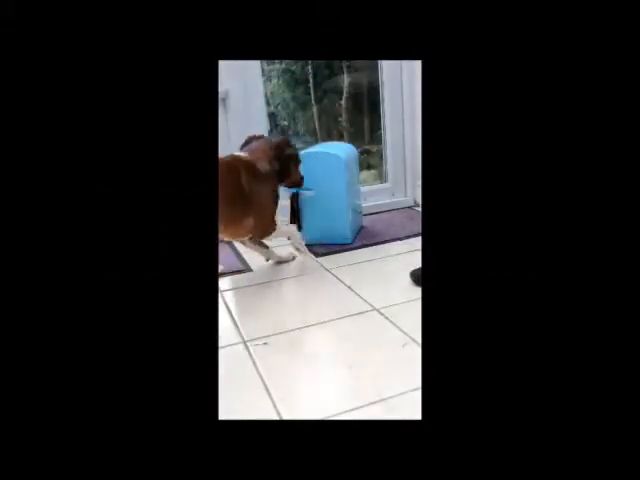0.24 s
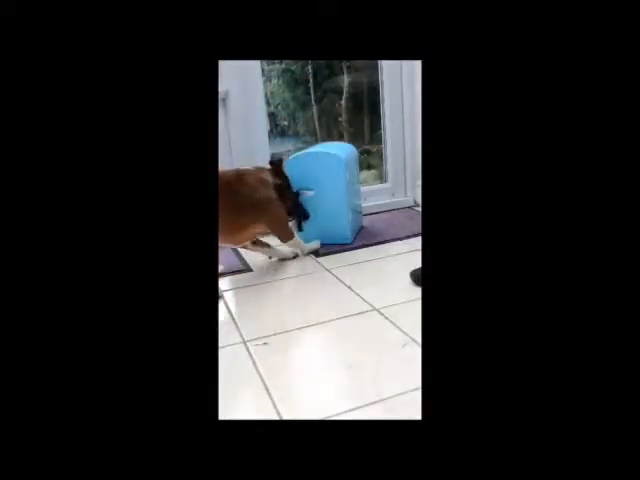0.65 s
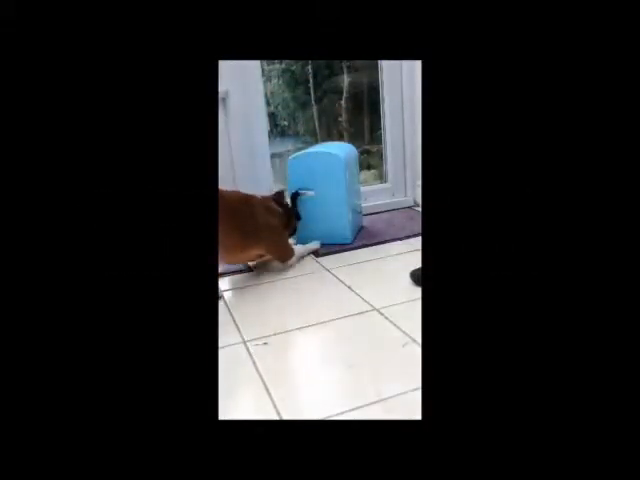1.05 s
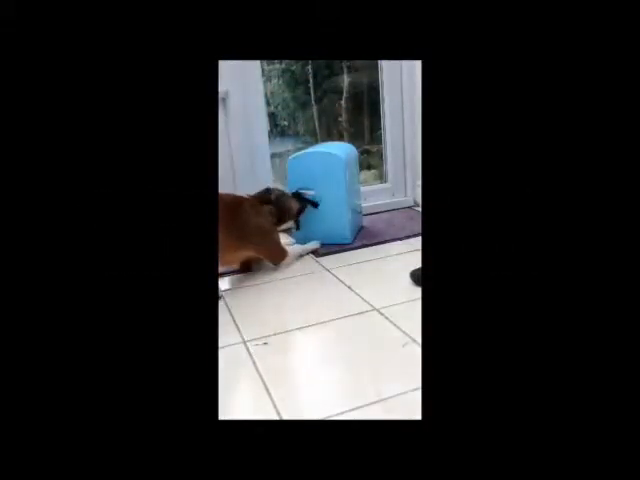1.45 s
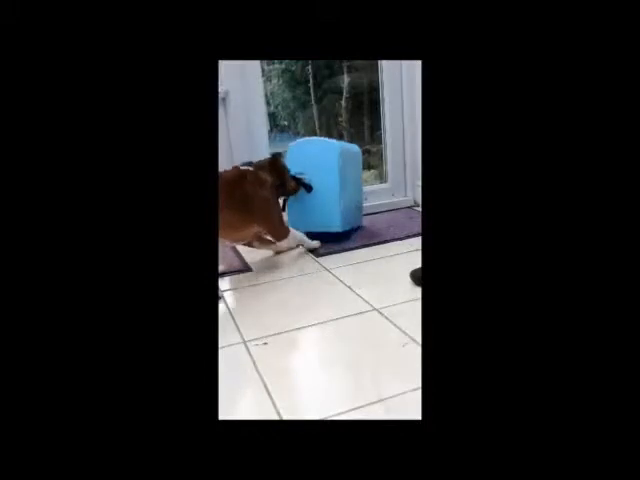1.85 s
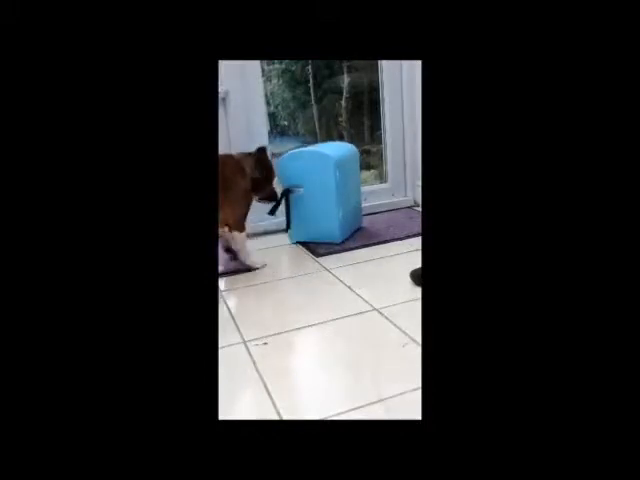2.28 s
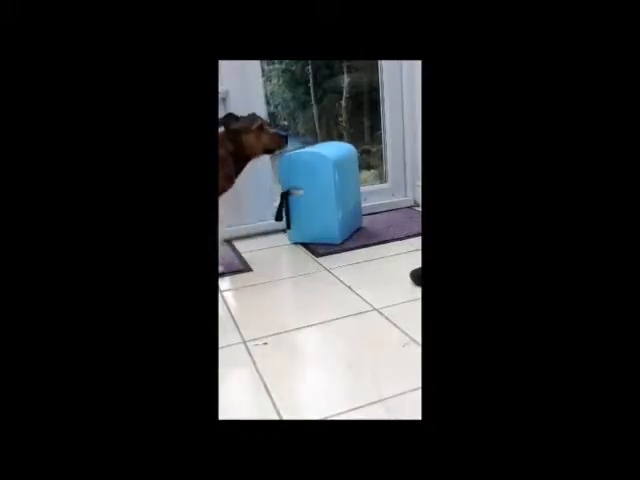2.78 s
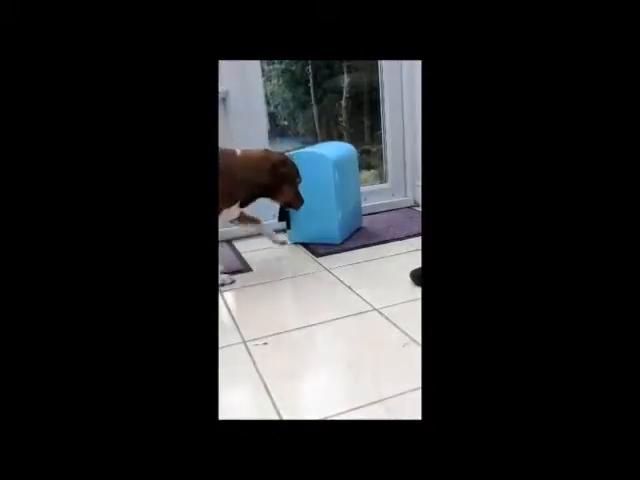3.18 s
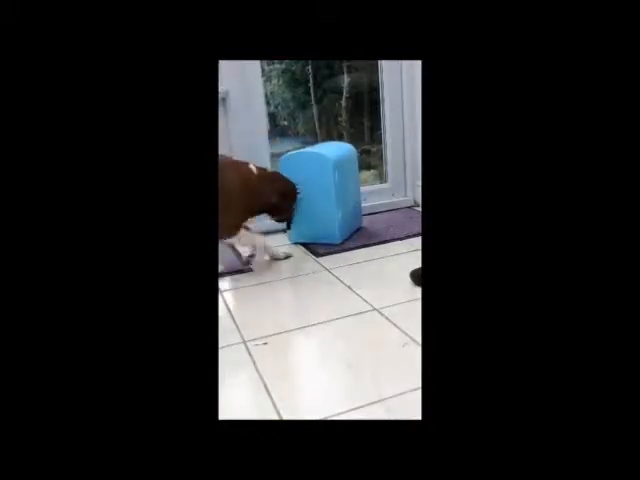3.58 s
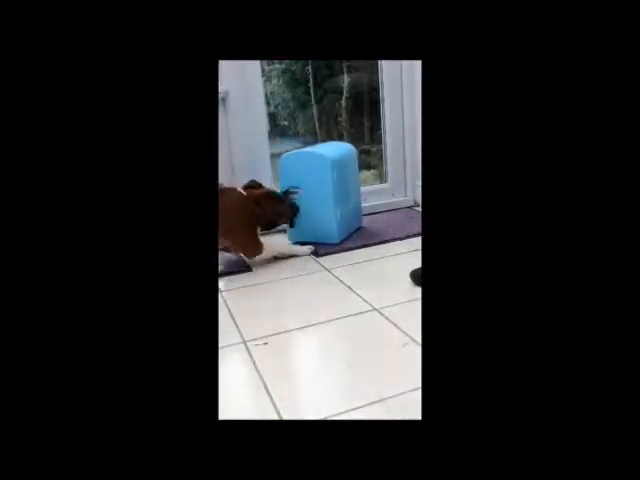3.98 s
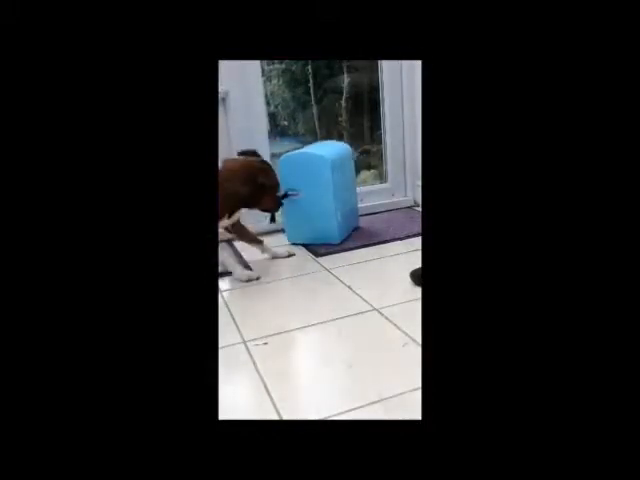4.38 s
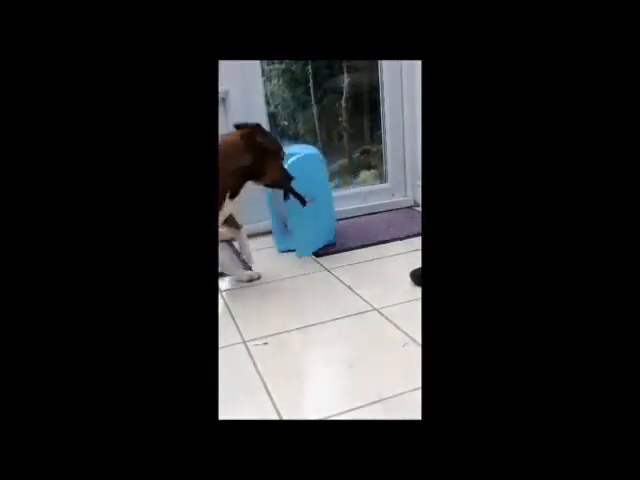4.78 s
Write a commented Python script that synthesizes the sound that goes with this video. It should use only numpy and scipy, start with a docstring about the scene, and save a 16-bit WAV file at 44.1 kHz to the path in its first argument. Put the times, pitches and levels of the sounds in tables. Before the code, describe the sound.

Sharp claw clicks open the scene, joined by plastic knocks within the first second or so. Small bumps, creaky rubs and faint nostril puffs follow, with a brief paw skid in the middle. Late on, sliding grows and the hollow box bangs and clacks as it is dragged. Small hard-surfaced kitchen, near handheld microphone, soft room hiss and motor hum.

```python
"""In a bright tiled kitchen a dog walks to a small plastic fridge, noses and tugs its door strap and drags it about.
Claws and box are struck resonators: clicks set decaying sines ringing, as short ticks and hollow knocks.
Rubbing on the mat is a dense train of slips through the box modes; skids and snuffles are shaped noise.
Band-by-band decaying noise answers as the room, over steady hiss and a faint motor hum."""
import sys
import numpy as np
from scipy import signal
from scipy.io import wavfile

SR = 44100
rng = np.random.default_rng(int(sys.argv[2]) if len(sys.argv) > 2 else 0)


def to_wav(sig):
    """Store sig (one row per channel, or 1-D mono) as 16-bit WAV at the path in sys.argv[1].

    Samples outside -1..1 are clipped; the rate is SR.
    """
    pcm = np.clip(np.atleast_2d(sig), -1, 1) * 32767
    pcm = np.round(pcm).astype(np.int16)
    wavfile.write(sys.argv[1], SR, pcm.T)  # frames by channels


def how_loud(loudness_db):
    """Turn decibels into a plain amplitude multiplier (0 dB gives 1, 20 dB gives 10)."""
    steps = np.asarray(loudness_db, float) / 20
    return 10 ** steps


N = 221900


def rms_one(x):
    """Normalisation: scale to a root-mean-square value of 1."""
    return x / np.sqrt(np.mean(x ** 2) + 1e-20)


def at_hz(points, hz, column=1):
    """Logarithmic frequency scale: interpolate a table column along it."""
    points = np.array(points)
    return np.interp(np.log(hz), np.log(points[:, 0]), points[:, column])


def filtered(x, order, cut_hz, kind):
    """Linear filtering: a Butterworth response of the given order and kind."""
    return signal.sosfilt(signal.butter(order, cut_hz, kind, fs=SR, output="sos"), x)


def strokes(rows, attack_s, release_s):
    """Amplitude envelope: for each row a straight rise, a hold and a straight fall."""
    t = np.arange(N) / SR
    envelopes = []
    for s, held_s, db, *_ in rows:
        corners = [s - attack_s, s, s + held_s, s + held_s + release_s]
        envelopes.append(np.interp(t, corners, [0, how_loud(db), how_loud(db), 0]))
    return np.array(envelopes)


def blend(levels, values):
    """Weighted mean: a quality follows the strokes then sounding, by their strength."""
    return np.sum(levels * values, axis=0) / (levels.sum(axis=0) + 1e-12)


def drift(rate_hz):
    """Low-pass random fluctuation: two equal poles at rate_hz leave slow chance with spread 1."""
    r = np.exp(-80 * np.pi * rate_hz / SR)   # computed at one point per 40 samples
    white = rng.standard_normal(N // 40 + 2002)
    slow = signal.lfilter([1], [1, -2 * r, r * r], white)[2000:]
    return np.interp(np.arange(N) / 40, np.arange(len(slow)), rms_one(slow))


def ring(clicks, hz, t60):
    """Damped resonance: a unit click starts a sine of height 1, with t60 never below 1 ms."""
    r = how_loud(-60 / (max(t60, .001) * SR))
    w = 2 * np.pi * hz / SR
    return signal.lfilter([0, np.sin(w)], [1, -2 * r * np.cos(w), r * r], clicks + 1e-18)


def strike(times, modes, gains_db, scatter_db, pan_db=0, contact_s=0):
    """Modal excitation: each blow starts each mode at its own strength and moment; gains_db is blows x modes."""
    flight_s = 0.000996
    sides_db = pan_db * np.array([[.5], [-.5]])   # left, right
    chance = rng.standard_normal((len(times), len(modes), 2))
    out = 0
    for k, (hz, level_db, t60) in enumerate(modes):
        delay_s = flight_s + contact_s * abs(chance[:, k, 1])
        at = ((np.array(times) + delay_s) * SR).astype(int)
        strength_db = gains_db[:, k] + level_db + scatter_db * chance[:, k, 0]
        clicks = np.zeros((2, N))
        clicks[:, at] = how_loud(strength_db + sides_db) * (-1) ** k   # alternate modes start inverted
        out = out + ring(clicks, hz, t60)
    return out


def bands(size, likeness):
    """Interaural coherence: half-octave stereo noise whose mid and side shares set left-right likeness."""
    edges_hz = 22 * 2 ** np.arange(0, 9.6, .5)
    white = rng.standard_normal((2, 2, size))   # neighbouring bands use different noise
    for k, (low, high) in enumerate(zip(edges_hz, edges_hz[1:])):
        mid, side = filtered(white[k % 2], 2, [low, high], "band")
        hz = np.sqrt(low * high)
        alike = np.clip(at_hz(likeness, hz), 0, 1)
        yield hz, np.sqrt(1 + alike) * mid + np.sqrt(1 - alike) * side * [[1], [-1]]


# claws on tile: t/s, strength/dB, tick centre f/Hz, tile clack re strength/dB,
# direct path as shaded by the dog's body/dB
CLAWS = [(0.0537, -7, 11000, -28, -5), (0.2188, -11, 9000, -18.5, -12.5), (0.6884, -0.5, 10200, -7, 0.5),
         (1.0268, 0.5, 6500, -17.5, -4), (2.1996, -7, 9700, -37, 1), (3.024, -14.5, 10100, -20, -5),
         (3.3553, -29.5, 8960, -35, -1), (3.6382, -30.5, 7250, -9, -7), (3.706, -30, 8540, -31, 2.5),
         (3.8352, -40, 9780, -13, -1), (4.586, -20, 7980, -16, -4)]
# modes of the hard claw tip: f/Hz, level/dB, t60/s
CLAW_MODES = [(4500, 1.5, 0.0014), (6770, -1.5, 0.0015), (8420, 1.5, 0.0014), (10780, 2.5, 0.0011),
              (12400, 0.5, 0.0011), (14500, -12, 0.0021)]
# modes of the tile: f/Hz, level/dB, t60/s
TILE_MODES = [(1670, 6, 0.0017), (1915, 0, 0.0049), (2580, -1, 0.0042), (3400, -1, 0.0037),
              (4000, -5, 0.0061)]


def claws():
    """Impact excitation: a hard tip ticks high and the tile clacks below, with nothing beneath them in the
    bass."""
    clack_hz = 2540
    s, strength_db, tick_hz, clack_db, _ = np.transpose(CLAWS)[:, :, None]
    tip_octaves = np.log2(np.array(CLAW_MODES)[:, 0] / tick_hz)
    tile_octaves = np.log2(np.array(TILE_MODES)[:, 0] / clack_hz)
    tip_db = strength_db + 3.5 - 6.0 * tip_octaves ** 2
    tile_db = strength_db + clack_db + 8 - 9.9 * tile_octaves ** 2
    tips = strike(s[:, 0], CLAW_MODES, tip_db, scatter_db=2, pan_db=6.0)
    clacks = strike(s[:, 0], TILE_MODES, tile_db, scatter_db=2.06, pan_db=-9.0)
    return filtered(tips, 2, 5300, "high") + filtered(clacks, 2, 600, "high")


# returns of each tick from floor, box and door: delay t/s, level/dB
NEAR_ECHOES = [(.0009, -8.5), (.0016, -8.5), (.0027, -13)]


def heard_directly(ticks):
    """Direct sound and early reflection: a path shaded anew at each claw, then its nearest echoes."""
    s, shade_db = np.array(CLAWS)[:, 0], np.array(CLAWS)[:, -1]
    latest = np.maximum(np.searchsorted(s, np.arange(N) / SR) - 1, 0)
    straight = ticks * how_loud(shade_db)[latest]
    echoes = sum(how_loud(db) * np.roll(straight, round(late_s * SR), axis=1) for late_s, db in NEAR_ECHOES)
    return straight + echoes


# blows on the box: t/s, strength/dB, f/Hz struck hardest, thump of the whole box re strength/dB,
# door panel re strength/dB
KNOCKS = [(0.654, -14, 1740, -45, -12), (0.873, -36, 1770, -26, -32), (0.893, -23.5, 324, -22, -17),
          (1.019, -18, 1570, -32, -6.5), (1.023, -13, 1620, -31, -24.5), (1.212, -36, 342, -6, -20),
          (1.629, -35, 1950, -26, -2), (1.885, -21.5, 520, -37, -12.5), (1.935, -20, 700, -47.5, -14.5),
          (2.152, -24.5, 262.5, -18.5, -12.5), (3.268, -39, 283, -14, -13), (3.762, -37, 1000, -14, -6),
          (4.482, -31.5, 880, -19, -14), (4.712, -23, 328, -24, -16), (4.763, -4, 386, -14.5, -10),
          (4.936, -10, 1480, -39, 1), (4.952, -28.5, 1290, -39, 2.5)]
# modes of the hollow plastic box and door: f/Hz, level/dB, t60/s
BOX = [(103, 2, 0.072), (120.2, -1, 0.14), (207.5, -8, 0.29), (259, -3, 0.089), (322.7, -5.5, 0.14),
       (376, -1, 0.088), (487, -5.5, 0.069), (604, -4, 0.087), (758, 0, 0.059), (959, 4.5, 0.024),
       (1142, 6, 0.011), (1350, 7.5, 0.022), (1678, 8, 0.017), (2113, 10, 0.021), (2460, 6.5, 0.034),
       (3215, 1, 0.048), (3780, 0, 0.013)]
# modes of hard plastic at the point of contact: f/Hz, level/dB, t60/s
CONTACT = [(2350, 19, 0.0014), (2880, 8.5, 0.0094), (4600, 6, 0.0064), (6700, 2.5, 0.0041),
           (8300, 7, 0.00062)]


def knocks():
    """Modal selection: the blow favours modes near its own pitch; low modes thump, the door rings, contact cracks."""
    s, strength_db, hz, thump_db, door_db = np.transpose(KNOCKS)[:, :, None]
    mode_hz = np.array(BOX)[:, 0]
    brightness = np.log2(hz / 1000)   # octaves above 1 kHz
    # a brighter blow reaches a wider range of modes, and cracks more
    spread_octaves = 0.61 * 2 ** (0.33 * brightness)
    crack_db = -17 + 11 * brightness

    gains_db = strength_db - 12.0 - 5.8 * (np.log2(mode_hz / hz) / spread_octaves) ** 2
    is_thump = mode_hz < 230
    is_door = (mode_hz > 860) & (mode_hz < 1250)
    gains_db = np.where(is_thump, strength_db + thump_db + 5.0, gains_db)
    gains_db = np.where(is_door, strength_db + door_db - 0.5, gains_db)

    crack_gains_db = strength_db + crack_db + np.zeros(len(CONTACT))
    crack = strike(s[:, 0], CONTACT, crack_gains_db, scatter_db=3.5)
    body = strike(s[:, 0], BOX, gains_db, scatter_db=1.5, pan_db=-1.5, contact_s=0.001514)
    return filtered(body + crack, 2, 80, "high")   # too small to radiate deep bass


# box rubbing on its mat: t/s, held t/s, level of the walls/dB, door panel re walls/dB, grit re walls/dB
RUB = [(0.898, .005, -36.5, 2, -4), (1.211, 0.038, -47.5, 3, -1.5), (1.625, 0.06, -52, 6.5, -1),
       (1.806, .005, -45, 2.5, -16), (1.906, 0.041, -43.5, 10, 6.5), (1.973, 0.0094, -46, 12, 13.5),
       (2.065, 0.018, -50, 9.5, 9), (2.16, 0.016, -44, 7.5, 8.5), (2.32, 0.25, -60.5, 9.5, 12.5),
       (2.555, 0.078, -60, 10, 10.5), (2.99, 0.0096, -56, 2, -12), (3.149, 0.012, -51.5, -3, 1),
       (3.3, 0.018, -43.5, -15, -19), (3.775, 0.0088, -42, -3, -7), (4.47, 0.25, -57.5, 5, 11),
       (4.731, 0.09, -41.5, 9, 10.5)]


def rub():
    """Stick-slip friction: dense uneven slips shake the walls, the door panel and, with grit, the high modes."""
    levels = strokes(RUB, attack_s=0.028, release_s=0.029)
    door_db, grit_db = np.array(RUB)[:, 3:].T
    slips_per_s = 700 * how_loud(5.5 * drift(30))
    happens = rng.random(N) < slips_per_s / SR
    size = how_loud(4.0 * np.minimum(rng.exponential(1, N), 4))
    slips = happens * size * rng.choice([-1, 1], N)
    dealt = rng.integers(0, 4, N)   # each slip drives every fourth mode
    # while rubbing, the modes ring for 0.6 of their tabled t60
    modes = [how_loud(db) * ring(slips * (dealt == k % 4), hz, 0.6 * t60) for k, (hz, db, t60) in enumerate(BOX)]
    walls = rms_one(sum(modes[2:7]))
    door = rms_one(sum(modes[7:11]))
    grit = rms_one(sum(modes[11:]))
    rubbing = levels.sum(axis=0) * walls + how_loud(door_db) @ levels * door + how_loud(grit_db) @ levels * grit
    return how_loud(-7.5) * rubbing


# paws and strap sliding: t/s, held t/s, level/dB, tilt toward the low treble/dB per octave below 9 kHz
SKID = [(0.513, 0.0035, -43, -4.5), (0.874, 0.0038, -45.5, -9.5), (1.226, .05, -53.5, -1),
        (1.68, 0.13, -52.5, 0.5), (1.9, 0.0041, -47, -3), (1.966, 0.0046, -48, -7.5),
        (2.144, 0.01, -47, 1.5), (2.229, 0.021, -36, -7.5), (2.32, 0.063, -45.5, -4.5),
        (2.68, 0.07, -53.5, -1), (2.849, 0.006, -50.5, -4), (2.95, .02, -53.5, -1.5),
        (3.646, 0.055, -47.5, -5.5), (3.76, 0.015, -56, 2), (3.839, 0.048, -47.5, -3.5),
        (4.016, .01, -54.5, -0.5), (4.298, 0.02, -38.5, -11.5), (4.386, .16, -39.5, -7.5),
        (4.603, 0.0046, -32.5, -3.5), (4.66, 0.13, -38, -4), (4.924, .12, -34, -5)]
# spectrum of sliding: f/Hz, density level/dB per Hz
SKID_COLOUR = [(880, -38), (1500, 2.5), (2520, -0.5), (3610, 2), (4140, 0.5), (11600, -3.5), (14500, -10.5),
               (15500, -16)]
# stereo likeness of skids and of the kitchen's echo: f/Hz, left-right likeness/1
LIKENESS = [(30, .7), (70, 0.46), (250, 1), (500, 0.87), (1000, 0.69), (2000, 0.3), (4000, 0.023),
            (12000, 0.24)]


def skid():
    """Friction noise: fine broadband hiss from sliding, tilted lower for a heavier slide."""
    levels = strokes(SKID, attack_s=0.037, release_s=0.049)
    tilt_db = blend(levels, np.array(SKID)[:, 3:])
    noise = 0
    for hz, band in bands(N, LIKENESS):
        if hz > 1200:
            band_db = at_hz(SKID_COLOUR, hz) + tilt_db * np.log2(9000 / hz) + 2.73 * drift(20.0)
            noise = noise + how_loud(band_db) * band
    return how_loud(5.0) * levels.sum(axis=0) * noise


# snuffles: t/s, held t/s, level/dB, first centre f/Hz
SNUFFLE = [(1.27, 0.025, -52, 3746), (1.464, .005, -47, 4900), (1.54, 0.033, -55, 4080),
           (2.701, .06, -48.5, 5150), (2.985, .03, -43.5, 3210), (3.05, 0.061, -48, 3390),
           (3.64, 0.014, -46, 3310), (3.998, 0.046, -48, 4000)]


def snuffle():
    """Turbulent flow: breath in the nostrils is noise round a moving centre, from whistly to breathy."""
    rest_hz, settle_s = 3496, .08   # the nostrils relax toward one pitch
    whistle_hz, breathy_per_khz = 2830, 0.38   # the higher the centre, the breathier
    levels = strokes(SNUFFLE, attack_s=.025, release_s=.07)
    s, first_hz = np.array(SNUFFLE)[:, :1], np.array(SNUFFLE)[:, 3:]
    since_s = np.maximum(np.arange(N) / SR - s, 0)
    hz = blend(levels, rest_hz + (first_hz - rest_hz) * np.exp(-since_s / settle_s))

    narrow = rms_one(filtered(rng.standard_normal((2, N)), 2, 230, "low"))
    wide = rms_one(filtered(rng.standard_normal((2, N)), 2, 900, "low"))
    share = np.clip(breathy_per_khz * (hz - whistle_hz) / 1000, 0, 1)
    breath = np.sqrt(1 - share) * narrow + np.sqrt(share) * wide
    # two noises in quadrature carry the breath up to its centre
    phase = np.cumsum(2 * np.pi * hz / SR)
    carried = breath[0] * np.cos(phase) + breath[1] * np.sin(phase)
    return how_loud(-2) * levels.sum(axis=0) * carried


# reverberation of the tiled kitchen: f/Hz, t60/s, level/dB
KITCHEN = [(102, 0.56, -23), (280, 0.24, 2), (786, 0.34, -1), (2000, 0.42, 1), (5130, 0.36, 1),
           (9600, 0.31, -4.5), (14000, 0.28, -5)]


def kitchen(x):
    """Diffuse reverberation: reflections thicken briefly, then each band dies with its own decay and energy."""
    build_up_s = 0.0008
    t = np.arange(SR // 2) / SR
    tail = 0
    for hz, band in bands(len(t), LIKENESS):
        decay = how_loud(-60 * t / at_hz(KITCHEN, hz)) * (1 - np.exp(-t / build_up_s))
        unit_energy = decay / np.sqrt(np.sum(decay ** 2))
        tail = tail + how_loud(at_hz(KITCHEN, hz, column=2)) * band * unit_energy
    return signal.fftconvolve(x[None], tail, axes=1)[:, :N]


# spectrum of the room hiss, relative: f/Hz, density level/dB per Hz
HISS = [(15, -35), (25, -1.5), (96, -5), (148, -2.5), (523, 1.5), (1080, -3.5), (1170, -2), (1570, -7),
        (3530, -5.5), (6050, -9), (11500, -9), (14300, -11), (15500, -25)]
# stereo likeness of the hiss: f/Hz, left-right likeness/1
HISS_LIKENESS = [(30, 0.89), (60, 0.12), (200, 0.28), (700, 0.25), (2400, 0.035), (12000, 0.06)]
# humps of the motor hum: f/Hz, level/dB, width/Hz
HUM = [(92.8, -66.5, 20), (215.8, -69, 6.3), (1180, -66, 4.7)]


def background():
    """Stationary noise: steady hiss that wavers a little, with a motor's narrow resonant humps."""
    together = drift(22.0)
    hiss = 0
    for hz, band in bands(N, HISS_LIKENESS):
        band_db = at_hz(HISS, hz) + 0.15 * together + 2.5 * drift(10)
        hiss = hiss + how_loud(band_db) * band
    hum = 0
    for hz, db, width_hz in HUM:
        hump = ring(rng.standard_normal(N), hz, 2.1 / width_hz)   # a longer ring is a narrower hump
        hum = hum + how_loud(db) * rms_one(hump)
    return how_loud(-46) * rms_one(hiss) + hum


def scene():
    """Superposition: direct sources near the door, their echo in the kitchen, and the background."""
    ticks, slide = claws(), skid()
    box = knocks() + rub() + snuffle()
    echo = kitchen((ticks + slide + box).mean(axis=0))
    diffuse = echo + slide + background()
    # steep low-pass on echo, slide and background: 40 dB down from 15.4 kHz
    low_pass = signal.cheby2(10, 40, 15400, fs=SR, output="sos")
    return heard_directly(ticks) + box + signal.sosfilt(low_pass, diffuse)


def top_cut(x):
    """Nothing passes above the cut-off."""
    return signal.sosfilt(signal.butter(12, 16650, fs=SR, output="sos"), x)


def record(dry):
    """Transducer response and saturation: the microphone drops the deepest bass and peaks are rounded."""
    heard = filtered(dry, 1, 30, "high")
    mix = 0.95 * np.tanh(heard / 0.93)
    return top_cut(mix)


dry = scene()
out = record(dry)
to_wav(out)
```